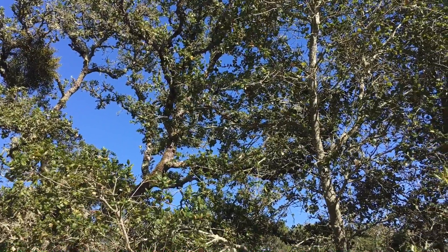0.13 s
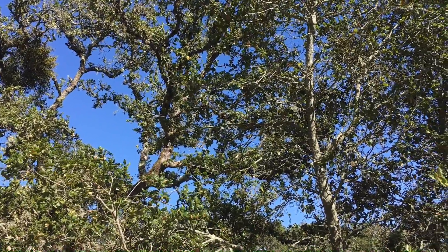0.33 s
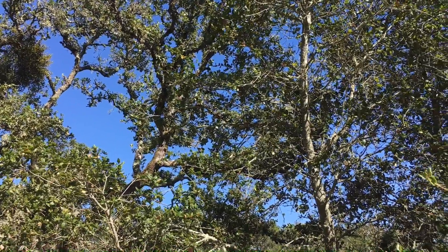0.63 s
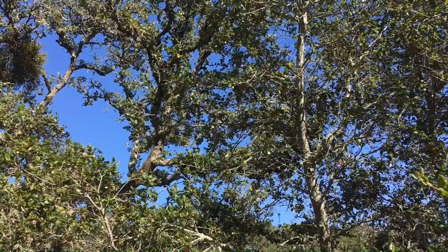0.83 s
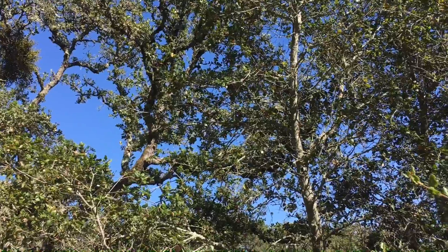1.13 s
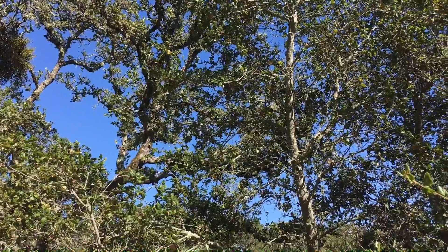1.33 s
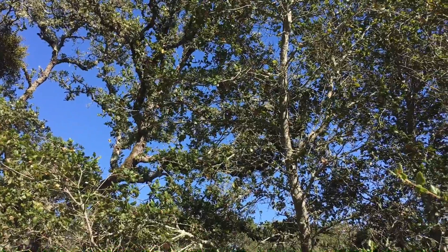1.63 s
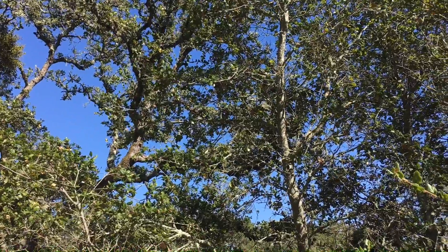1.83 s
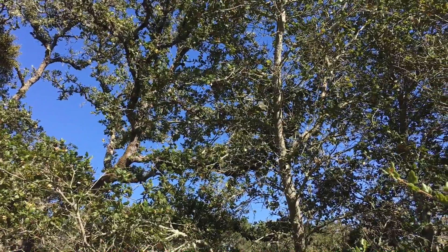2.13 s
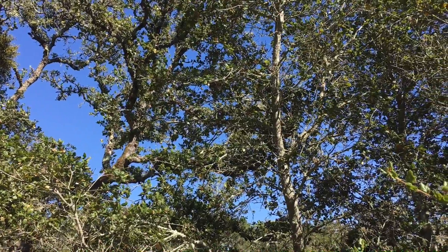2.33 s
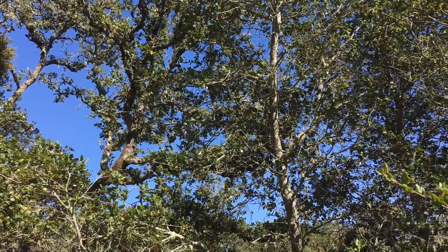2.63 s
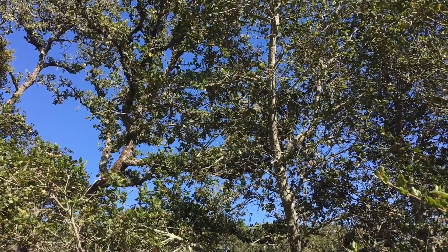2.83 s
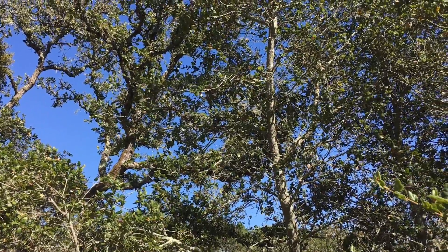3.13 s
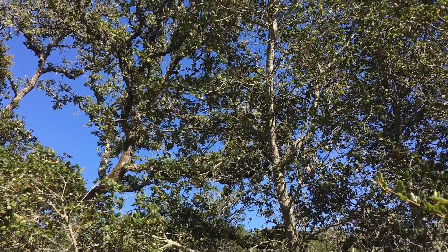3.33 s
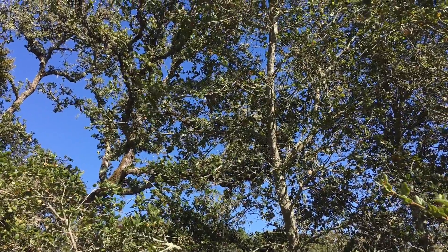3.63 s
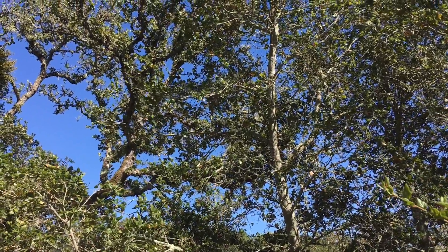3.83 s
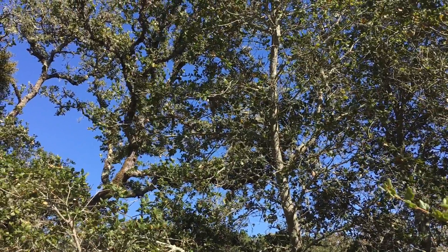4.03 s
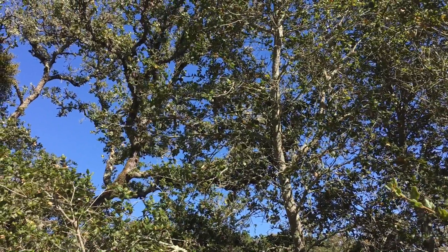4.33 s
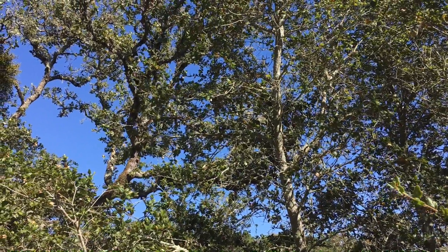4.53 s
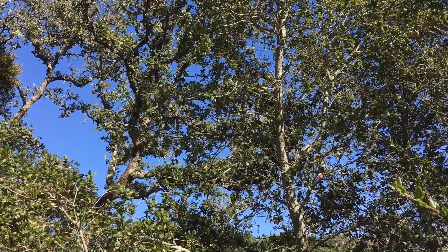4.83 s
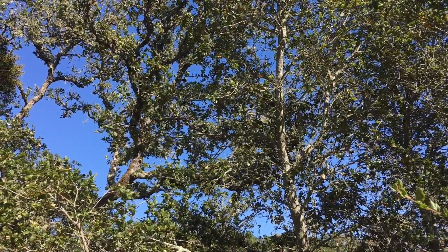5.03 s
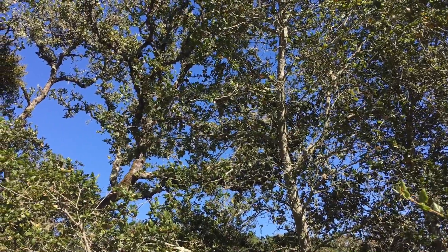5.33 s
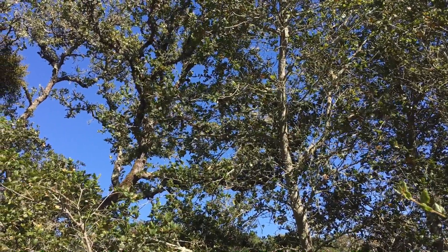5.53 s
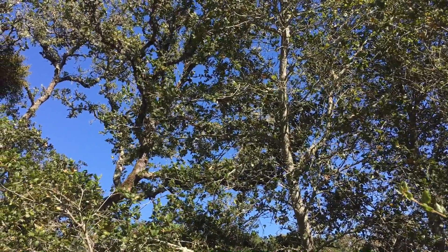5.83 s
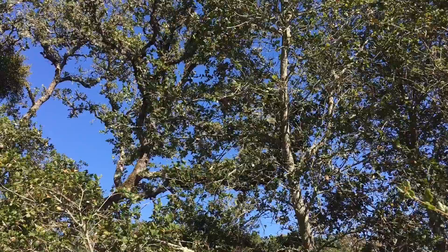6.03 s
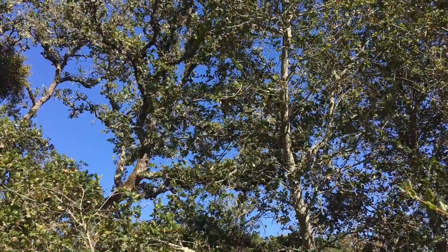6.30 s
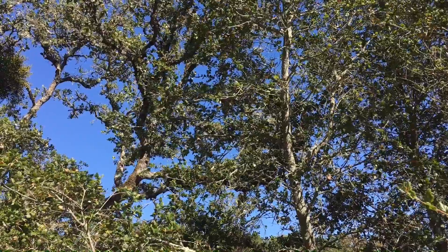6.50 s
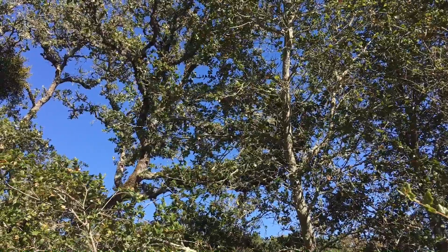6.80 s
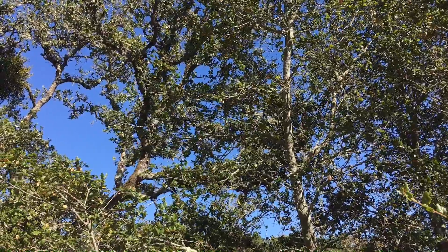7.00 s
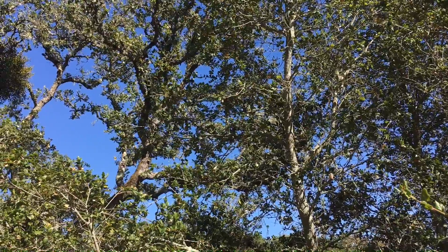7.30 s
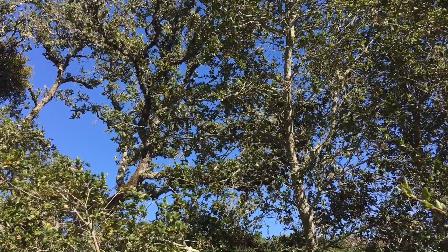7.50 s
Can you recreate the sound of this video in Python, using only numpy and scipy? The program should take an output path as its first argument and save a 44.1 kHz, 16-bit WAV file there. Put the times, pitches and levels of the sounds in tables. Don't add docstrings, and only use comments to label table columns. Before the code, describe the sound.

Small songbirds call a few metres away in sunny trees: a hooked chip into a nasal downward slide, a rising two-voiced whistle, buzzy-started falling whistles, then a quick four-syllable trill. Dry twigs tick and leaves rustle close by. After another rising note a hard gust buffets the phone microphone with low thumps, overlapping a second falling call. Leaves add a short airy echo over soft hum and hiss.

```python
import sys
import numpy as np
from scipy import signal
from scipy.fft import rfft, irfft, next_fast_len
from scipy.io import wavfile
from scipy.ndimage import uniform_filter1d

SR = 44100
rng = np.random.default_rng(int(sys.argv[2]) if len(sys.argv) > 2 else 0)


def boost_factor(decibels):
    exponent = np.asarray(decibels, float) / 20
    return 10 ** exponent


def int16_out(signal):
    q = np.round(np.clip(np.atleast_2d(signal).T, -1, 1) * 32767)
    wavfile.write(sys.argv[1], SR, q.astype(np.int16))


N = 337790
TIME = np.arange(N) / SR


def level(x, db):
    return x * boost_factor(db) / np.sqrt(np.mean(x ** 2))


def colour(x, points):
    hz, db = np.transpose(points)
    n = next_fast_len(len(x), True)
    f = np.arange(n // 2 + 1) * SR / n + 1
    gain_db = np.interp(np.log(f), np.log(hz), db, -150, -150)
    return irfft(rfft(x, n) * boost_factor(gain_db), n)[:len(x)]


def walk(rate, size=N):
    hold = int(SR / rate)
    held = np.repeat(rng.standard_normal(size // hold + 1), hold)
    return 1.3 * uniform_filter1d(uniform_filter1d(held, hold), hold)[:size]


def arc(share, dbs):
    return np.interp(share, [0, .5, 1], dbs)


def partial(phase, db):
    flutter_db, flutter_hz = 1.7, 60
    wobble_rad, wobble_hz = .45, 180
    size = len(phase)
    loudness = boost_factor(db + flutter_db * walk(flutter_hz, size))
    return loudness * np.sin(phase + wobble_rad * walk(wobble_hz, size))


def track(rows, start=0.):
    s, hz, *dbs = np.transpose(rows)
    s = s + start
    i = np.arange(max(int(s[0] * SR), 0), min(int(s[-1] * SR), N))
    t = TIME[i]
    fade_s = .004
    gate = np.clip(np.minimum(t - s[0], s[-1] - t) / fade_s, 0, 1)
    phase = 2 * np.pi * np.cumsum(np.interp(t, s, hz)) / SR
    return i, phase, gate, [np.interp(t, s, db) + 4 for db in dbs]


def voice(rows, start=0., pitch=0.99):
    i, phase, gate, dbs = track(rows, start)
    out = np.zeros(N)
    out[i] = gate * sum(partial((k + 1) * pitch * phase, db) for k, db in enumerate(dbs))
    return out


def coupled(lower, upper, start=0.):
    i, a, gate_a, _ = track(lower, start)
    j, b, gate_b, _ = track(upper, start)
    both = np.intersect1d(i, j)
    p, q = both - i[0], both - j[0]
    return both, a[p], b[q], gate_a[p] * gate_b[q]


# start in seconds, level in dB, then buzz, step and tail lengths in seconds.
NEAR_CALLS = [
    (2.571, -0.2, .053, .05, .445),
    (5.797, -0.1, .05, .045, .41),
]
HIDDEN_CALLS = [
    (3.502, -3, .066, .064, .13),
    (7.337, 1.6, .096, .02, .19),
]
# share of the tail (0-1), pitch in Hz, level in dB.
NEAR_TAIL = [(0, 3590, -56), (.05, 3290, -58), (.1, 3165, -57), (0.241, 3080, -58), (.4, 2990, -58),
             (.55, 2850, -60), (.66, 2800, -60), (.73, 2770, -69), (.9, 2725, -72), (1, 2700, -88)]
HIDDEN_TAIL = [(0, 3876, -54), (.3, 3648, -53), (.55, 3420, -54.5), (.8, 3290, -62), (1, 3250, -74)]
# pitch from and to in Hz, level from and to in dB.
STEPS = [
    (3630, 4000, -61, -60),
    (3830, 3920, -59, -60),
]
# pitch in Hz, octave level against the note in dB.
OCTAVE_OPENING = [
    [(2750, -15), (2880, -20), (2960, -40)],
    [(3300, -11), (3600, -21), (3720, -44)],
]
TAIL_GAP_S = [-.0012, .004]


def falling_calls(rows, bird, tail):
    out = np.zeros(N)
    share, hz, tail_db = np.transpose(tail)
    octave_db = tail_db + np.interp(hz, *np.transpose(OCTAVE_OPENING[bird]))
    from_hz, to_hz, from_db, to_db = STEPS[bird]
    for s, db, buzz_s, step_s, tail_s in rows:
        step = [(-.005, from_hz, from_db),
                (.3 * step_s, from_hz, from_db),
                (.8 * step_s, to_hz, to_db),
                (step_s, to_hz, to_db),
                (step_s + .007, .92 * to_hz, to_db - 8)]
        sinking = np.transpose([share * tail_s, hz, tail_db, octave_db])
        out += boost_factor(db) * voice(step, s + buzz_s)
        out += boost_factor(db) * voice(sinking, s + buzz_s + step_s + TAIL_GAP_S[bird])
    return out


# time in seconds, pitch in Hz, level in dB, octave in dB.
INTRO = [
    (4.232, 2822, -83, -70),
    (4.262, 3005, -65, -60.5),
    (4.285, 2960, -92, -65),
]
# time in seconds, pitch in Hz, level in dB.
HOOK = [
    (.842, 4400, -70),
    (.85, 4200, -59),
    (.858, 3600, -58),
    (.88, 3340, -59),
    (.912, 3150, -62),
    (.922, 2900, -73),
    (.936, 2600, -90),
]


def short_whistles():
    return voice(INTRO) + voice(HOOK)


# pitch from and to in Hz, level in dB, warble depth in Hz.
NEAR_BUZZ = (5230, 3860, -54.5, 430)
# start and length in seconds, from and to in Hz, dB, warble in Hz.
HIDDEN_BUZZES = [
    (3.5, .062, 5200, 3950, -53.5, 470),
    (7.334, .046, 4950, 5000, -55, 230),
    (7.356, .03, 4600, 3850, -56, 330),
    (7.38, .022, 4100, 4500, -56, 330),
    (7.398, .036, 4800, 4600, -56, 220),
    (7.404, .03, 4050, 3700, -58, 300),
]
BUZZ_EDGES = [
    (2.538, .036, 4400, 5100, -64, 90),
    (5.764, .036, 4450, 5100, -66, 90),
    (3.468, .038, 3900, 4900, -62, 150),
    (7.311, .03, 3900, 4500, -61, 100),
    (2.6, .027, 3950, 3650, -56, 160),
    (5.828, .027, 3950, 3650, -57, 160),
]
# start and length in seconds, pitch in Hz, level in dB, warble depth in Hz.
CHIPS = [
    (.834, .034, 4400, -64, 220),
    (4.259, 0.036, 5260, -59, 52),
    (.828, .05, 5150, -74, 60),
]
# share of the buzz, length in seconds, from and to in Hz, dB, warble in Hz.
OVERTONE_CHIP = (.55, .03, 7200, 7350, -75, 150)
# seconds after start, length in seconds, from and to in Hz,
# level in dB, warble depth in Hz.
SPLASH = [
    (.003, .032, 6900, 6000, -66, 1300),
    (.006, .032, 6150, 7000, -60, 30),
    (.008, .022, 5000, 5700, -67, 100),
    (.012, .02, 6900, 7500, -69, 100),
    (.004, .03, 8500, 8900, -72, 350),
]


def buzz_rows():
    rows = [(s, length, hz, .96 * hz, db, depth) for s, length, hz, db, depth in CHIPS]
    rows += [(s, buzz_s, *NEAR_BUZZ) for s, db, buzz_s, *_ in NEAR_CALLS]
    rows += HIDDEN_BUZZES + BUZZ_EDGES
    after, *chip = OVERTONE_CHIP
    rows += [(s + after * buzz_s, *chip) for s, db, buzz_s, *_ in HIDDEN_CALLS]
    return rows + [(s + wait, *rest) for s, *_ in DUETS if s > 0 for wait, *rest in SPLASH]


def buzzes():
    out = np.zeros(N)
    warble_hz, jitter = 169.6, .3
    shake = np.sin(2 * np.pi * np.cumsum(warble_hz * (1 + jitter * walk(150))) / SR)
    for s, length, from_hz, to_hz, db, depth_hz in buzz_rows():
        i = int(s * SR) + np.arange(int(length * SR))
        u = np.linspace(0, 1, len(i))
        hz = from_hz + (to_hz - from_hz) * u + depth_hz * shake[i]
        swell = 1.63 * np.sin(np.pi * u ** .75) ** (2 / 3)
        out[i] += boost_factor(db) * swell * np.sin(2 * np.pi * np.cumsum(hz) / SR)
    return out


# time in seconds, pitch in Hz, effort in dB.
SLIDE = [
    (.945, 2110, -14),
    (.97, 2100, 1),
    (1.005, 2071, -0.3),
    (1.2, 1910, 0.6),
    (1.413, 1762, -0.5),
    (1.435, 1800, -8),
]
# level in dB at start, middle and end.
SLIDE_PARTIALS = [
    (-80, -82, -86),
    (-61, -68, -71.5),
    (-120, -66, -65),
    (-104, -82, -84),
]
# partial number, level in dB.
SLIDE_TOP = [(5, -81), (6, -82), (7, -79), (8, -94.5)]


def slide():
    i, phase, gate, (effort_db,) = track(SLIDE)
    u = np.linspace(0, 1, len(i))
    out = np.zeros(N)
    out[i] = gate * sum(partial((k + 1) * phase, effort_db + arc(u ** .55, dbs))
                        for k, dbs in enumerate(SLIDE_PARTIALS))
    out[i] += np.sin(np.pi * u) ** 2 * sum(partial(k * phase, db) for k, db in SLIDE_TOP)
    return out


# start in seconds, level in dB, stretch, lower pitch factor, coupling in dB.
DUETS = [
    (-.37, -3, .99, .995, -15),
    (1.415, -0.1, 1.025, 1.0, .1),
    (5.28, 0.25, .96, 1.004, .1),
]
# seconds after start, lower pitch in Hz, upper pitch in Hz, effort in dB.
DUET_SHAPE = [
    (0, 1680, 2612, -12),
    (.022, 1880, 2877, -2.5),
    (.048, 2090, 3010, -0.3),
    (.235, 2318, 3299, .1),
    (.36, 2503, 3430, 1),
    (.405, 2602, 3450, -0.5),
    (0.459, 2637, 3498, -3.5),
    (.53, 2644, 3510, -18),
]
MIXES = [
    (1, 0),
    (2, 0),
    (3, 0),
    (4, 0),
    (0, 1),
    (0, 2),
    (1, 1),
    (-1, 2),
    (2, 1),
    (1, 2),
]
# dB at start, middle and end.
MIX_DB = [(-75.5, -72, -74), (-58.5, -58, -69), (-69, -76, -97), (-77, -89, -99), (-65.5, -61, -57),
          (-61.5, -67.5, -86), (-59, -73, -92), (-110, -81, -67), (-69, -90, -99), (-79, -90, -99)]
# frequency in Hz, gain in dB.
BEAK = [(1500, -0.3), (4000, -0.4), (4350, 3), (4620, -5.5), (4950, 2), (5250, -2.5), (6500, -0.6)]


def duets():
    out = np.zeros(N)
    after, low_hz, up_hz, effort_db = np.transpose(DUET_SHAPE)
    for s, db, stretch, pitch, coupling_db in DUETS:
        lower = np.transpose([after * stretch, low_hz * pitch])
        upper = np.transpose([after * stretch, up_hz * 1.005])
        i, a, b, gate = coupled(lower, upper, s)
        u = (TIME[i] - s) / stretch
        lower_db = -500 * np.maximum(u - .48, 0) - 250 * np.maximum(.045 - u, 0)
        for (m, n), dbs in zip(MIXES, MIX_DB):
            phase = m * a + n * b
            line_hz = np.gradient(phase) * SR / (2 * np.pi)
            line_db = db + np.interp(u, after, effort_db) + arc(u / after[-1], dbs)
            line_db = line_db + np.interp(line_hz, *np.transpose(BEAK))
            line_db = line_db + (m != 0) * lower_db + (m * n != 0) * coupling_db
            out[i] += gate * partial(phase, line_db)
    return out


# start in seconds, level in dB, octave in dB, octave climb (0-1), pitch factor.
TRILL = [
    (4.323, -1.5, 1, .9, 1.039),
    (4.424, -.5, -1, 1, 1.023),
    (4.525, 0.3, 4, .05, 1.01),
    (4.626, -.5, -1, .05, 1.019),
]
# seconds after start, pitch in Hz, level in dB.
SYLLABLE = [
    (-.008, 2280, -80),
    (0, 2500, -74),
    (.009, 3150, -66),
    (.016, 3530, -59),
    (.035, 3130, -56),
    (.048, 2720, -62),
    (.062, 2360, -72),
    (.088, 2230, -78),
]
# seconds after start, pitch in Hz, level in dB.
PARTNER = [
    (-.006, 3610, -65),
    (.008, 3976, -62.5),
    (0.022, 4115, -66.5),
    (0.048, 4160, -64.5),
]
# seconds after start, pitch in Hz, level in dB.
OCTAVE = [
    (-.016, 4640, -72),
    (-.002, 4700, -64),
    (.005, 5000, -67),
    (.012, 6000, -74),
]


def trill():
    out = np.zeros(N)
    smear_hz = 507
    smear = walk(smear_hz)
    base_hz = OCTAVE[0][1]
    for s, db, octave_db, climb, pitch in TRILL:
        out += boost_factor(db) * (voice(SYLLABLE, s, pitch) + boost_factor(-2.5) * voice(PARTNER, s, pitch))
        hold = 1 + 3.5 * (1 - climb)
        octave = [(t * hold if t > 0 else t, base_hz + climb * (hz - base_hz), v) for t, hz, v in OCTAVE]
        unsteady = voice(octave, s) * (0.92 + 0.35 * smear)
        out += boost_factor(octave_db) * (unsteady + boost_factor(-23) * voice(octave[:2], s, 1.5))
        i, a, b, gate = coupled(SYLLABLE, PARTNER, s)
        haze_db = -60 - 10 * (s - TRILL[0][0])
        rough = gate * boost_factor(haze_db) * walk(2 * smear_hz, len(i))
        out[i] += rough * (np.sin(2 * b - a) + .3 * np.sin(2 * a) + .12 * np.sin(a + b))
    return out


# frequency in Hz, gain in dB.
LEAF_ECHO = [(20, -6), (2800, -2.5), (4200, .5), (5500, 1.5), (21000, 1.5)]


def trees(x, noise, wet_db=0.):
    near_t60_s, far_t60_s = .3, .7
    t = TIME[:SR // 2]
    near, far = noise * np.clip(t / .008, 0, 1)
    near = near * 1000 ** (-t / near_t60_s)
    far = far * 1000 ** (-t / far_t60_s)
    echo = boost_factor(-3.5) * near / np.linalg.norm(near) + boost_factor(-14) * far / np.linalg.norm(far)
    return x + boost_factor(wet_db) * signal.oaconvolve(x, colour(echo, LEAF_ECHO))[:N]


# time in seconds, peak in dB, low share in dB.
TICKS = [(.1365, -55, -2), (.159, -58, -1.5), (.1824, -58, -1.5), (.2326, -56, -3), (0.2454, -48.5, -.6),
         (.2572, -52, -4), (.3535, -60, -1.2), (.3775, -55.5, -1.5), (.3977, -58, 1), (.665, -59, -1.5),
         (0.819, -58, -3), (.839, -52, -5), (0.8696, -58, -1.5), (1.062, -57, -6), (1.3534, -61, -1.5),
         (1.6714, -57.5, 5), (1.7475, -52, -9.5), (2.0384, -60, -19.5), (3.7394, -57, 0), (3.791, -64, 3),
         (3.8265, -57, 0), (3.8704, -62, 1.2), (3.9094, -60.5, 1.5), (4.7626, -55, -19),
         (5.9752, -57, -12.5), (6.48, -67, 5.5), (6.699, -57, -15), (7.0082, -68, 4), (7.1778, -54, -8.5),
         (7.4686, -56, -8)]
# time in seconds, peak in dB, centre in Hz, low share in dB, length in ms.
SNAPS = [
    (2.828, -44, 11700, -14, 0.98),
    (2.8285, -49, 6800, -18, 0.9),
    (2.8283, -48, 9000, -18, 0.9),
    (3.8407, -47, 13100, -9, 0.85),
]
RUSTLES = [
    (2.76, -57.5, 11900, -17.5, 13),
    (2.94, -63, 11500, -7, 19.4),
    (3.89, -63, 12000, 3, 16),
    (3.94, -59, 11860, -7, 23.5),
    (3.995, -65.5, 11960, 4, 13),
]


def ticks():
    chance = np.clip(rng.standard_normal((len(TICKS), 2)), -2, 2)
    twigs = [(s, db, 12200 + 1100 * c, low_db, 4.6 * boost_factor(2 * d))
             for (s, db, low_db), (c, d) in zip(TICKS, chance)]
    out, size = np.zeros(N), 4096
    for s, db, hz, low_db, ms in twigs + SNAPS + RUSTLES:
        noise = rng.standard_normal((2, size))
        bright = colour(noise[0], [(5000, -18), (hz - 1500, -8), (hz, 0), (hz + 1500, -8), (15750, -13)])
        body = colour(noise[1], [(1200, -17.5), (3200, 2.5), (8000, -6.5)])
        u = np.arange(size) / (max(ms, .3) * SR / 1000)
        i = int(s * SR)
        burst = level(bright, db - 10) + level(body, db - 8.5 + low_db)
        out[i:i + size] += (u * np.exp(1 - u)) ** 2 * burst
    return out


# peak time in seconds, rumble in dB, edge in dB, rise and fall in seconds per 20 dB.
PUFFS = [(.15, -63, -64, .2, 0.2), (.4, -48.5, -67, 0.58, 0.17), (.72, -54, -75, .15, .1),
         (1.07, -48, -70, 0.41, .3), (1.47, -54.5, -68, 0.079, 0.27), (2.6, -52, -72, .06, 0.55),
         (2.3, -60, -72, .15, .2), (3.07, -58, -72, .1, .15), (3.36, -55, -72, .1, .15),
         (3.58, -50.5, -76, 0.17, 0.27), (4.12, -61, -72, .8, .8), (4.75, -61, -75, 0.089, 0.5),
         (5.33, -54.5, -63, 0.82, 0.3), (5.57, -43, -45, 0.14, 0.09), (5.67, -38, -38, .02, .15),
         (5.76, -43, -45, .15, .17), (5.975, -41, -40, 0.048, 0.1347), (6.41, -50, -62, .08, .14),
         (6.6, -59, -70, .1, .15), (6.86, -58, -70, .1, .1), (7.15, -61, -70, 0.82, .4)]


def flow(calm_db, peaks_db):
    t = TIME[::32]
    power = boost_factor(2 * calm_db)
    for peak_db, (s, _, _, rise, fall) in zip(peaks_db, PUFFS):
        power = power + boost_factor(2 * peak_db - 40 * np.maximum((s - t) / rise, (t - s) / fall))
    return np.interp(TIME, t, 10 * np.log10(power))


# frequency in Hz, level in dB per Hz.
RUMBLE = [(12, -55.5), (20, -12.5), (59, 2.5), (119, -6), (215, -12), (264, -21.5), (341, -27),
          (433, -28.5), (900, -74), (1170, -96.5), (1980, -120)]
# time in seconds, peak in dB, pitch in Hz.
SLAPS = [(0.05, -41, 58.4), (0.213, -38, 45.6), (0.286, -36, 61.5), (0.379, -39.5, 70.0),
         (0.697, -39.5, 55.4), (0.977, -37.5, 61.5), (1.055, -39, 72.7), (1.479, -39, 51.9),
         (2.594, -41, 63.4), (3.564, -35.5, 64.6), (4.723, -41.5, 74.4), (5.468, -37, 53.5),
         (5.518, -28.5, 61.5), (5.555, -25.5, 99.8), (5.657, -28, 65), (5.72, -33, 70), (5.75, -37, 56.4),
         (5.79, -30, 78.5), (5.842, -38, 49), (5.945, -34, 70), (5.975, -22, 65.4), (6.025, -36, 80),
         (6.052, -32, 64.6), (6.382, -41, 78)]
# time in seconds, peak in dB, pitch in Hz.
CRACKS = [(1.378, -50, 221), (3.807, -43.5, 193), (5.574, -30, 146.5), (5.617, -35.5, 152),
          (5.655, -29, 152), (5.713, -50.5, 151), (5.735, -37, 150), (5.765, -38, 150), (5.793, -32, 151),
          (5.932, -32, 150), (5.968, -17, 202), (5.998, -36, 172), (6.03, -30.5, 152), (6.058, -33.5, 149)]


def breeze():
    _, rumble_peaks, edge_peaks, _, _ = np.transpose(PUFFS)
    low_db = flow(-64, rumble_peaks)
    edge_db = flow(-66, edge_peaks) - low_db
    low = colour(colour(rng.standard_normal(N), RUMBLE), [(10, 2.5), (110, 3), (170, -12), (400, -70.5)])
    edge = colour(colour(rng.standard_normal(N), RUMBLE), [(90, -30), (180, 5), (2000, -11.5)])
    eddies_db = 1.7 * walk(25)
    wind = level(low, 0) + level(edge, -5.5) * boost_factor(edge_db + 0.48 * eddies_db)
    slaps = np.zeros(N)
    for s, db, hz in SLAPS + CRACKS:
        u = np.arange(int(2.5 * SR / hz)) * hz / SR
        i = int(s * SR)
        push = 3 * u * np.exp(-(u / 0.64) ** 1.33)
        slaps[i:i + len(u)] += boost_factor(db) * push * np.sin(2 * np.pi * u ** 0.68)
    slaps = colour(slaps, [(5, 3), (450, -0.5), (800, -8.5), (1600, -61.5)])
    return boost_factor(low_db + eddies_db) * wind + slaps


# frequency in Hz, level in dB per Hz.
HUM = [(76, -29.5), (130, 2), (174, -11), (335, -13.5), (483, -20), (646, -21), (877, -23.5), (2550, -28.5),
       (5000, -29), (6500, -38), (11000, -120)]
# frequency in Hz, level in dB per Hz.
HISS = [(2940, -74.5), (5000, -24), (5970, -3.5), (7670, -8), (9790, -4.5), (10500, -10.5), (11200, -3.5),
        (12100, -4.5), (12600, -0.5), (13700, -5), (14000, -2.5), (14700, -1), (15800, -3)]


def air():
    hum = level(colour(rng.standard_normal(N), HUM), -64.5) * boost_factor(0.13 * walk(2.23))
    hiss = level(colour(rng.standard_normal(N), HISS), -71.5) * boost_factor(.7 * walk(5) + .5 * walk(12))
    whine = colour(rng.standard_normal(N), [(14440, -30), (14500, 0), (14560, -30)])
    return hum + hiss + level(whine, -87)


def scene():
    leaves = rng.standard_normal((3, 2, SR // 2))
    near = falling_calls(NEAR_CALLS, 0, NEAR_TAIL) + short_whistles() + buzzes()
    near = near + boost_factor(2) * slide() + duets() + trill()
    rasp = 1 + .35 * walk(130)
    hidden = falling_calls(HIDDEN_CALLS, 1, HIDDEN_TAIL) * rasp
    birds = trees(boost_factor(-1) * near, leaves[1]) + trees(boost_factor(-1) * hidden, leaves[2], 1)
    twigs = trees(ticks(), leaves[0], -5)
    return (birds + twigs + breeze() + air())[None]


def low_pass(x):
    return signal.sosfilt(signal.butter(12, 15790, fs=SR, output="sos"), x)


def record(dry):
    bass_cut = signal.butter(3, 36, "high", fs=SR, output="sos")
    mix = signal.sosfilt(bass_cut, dry)
    return low_pass(mix)


dry = scene()
out = record(dry)
int16_out(out)
```